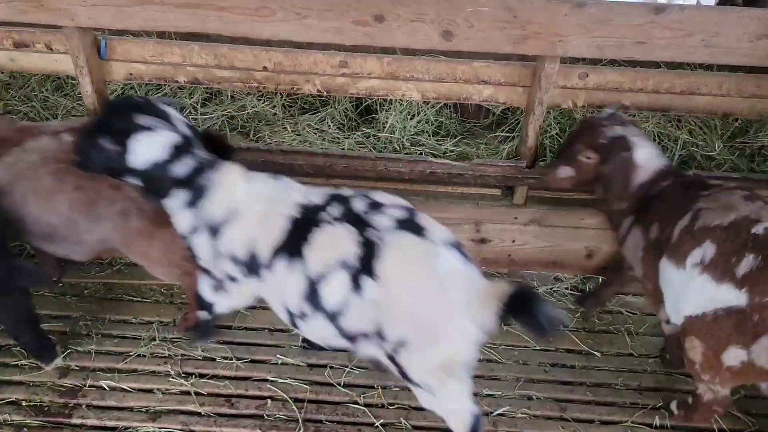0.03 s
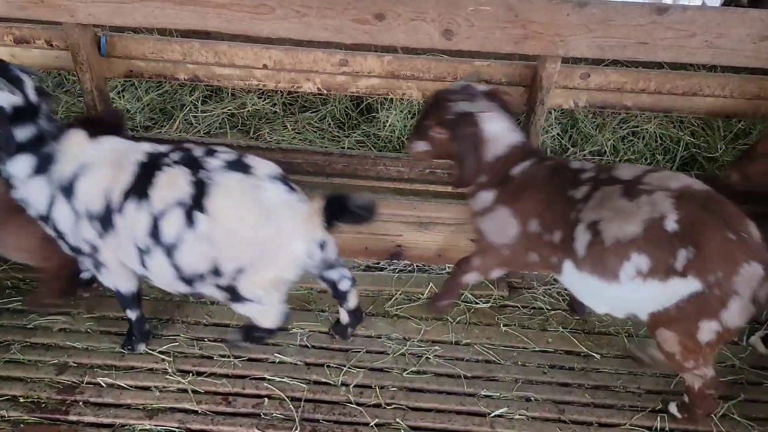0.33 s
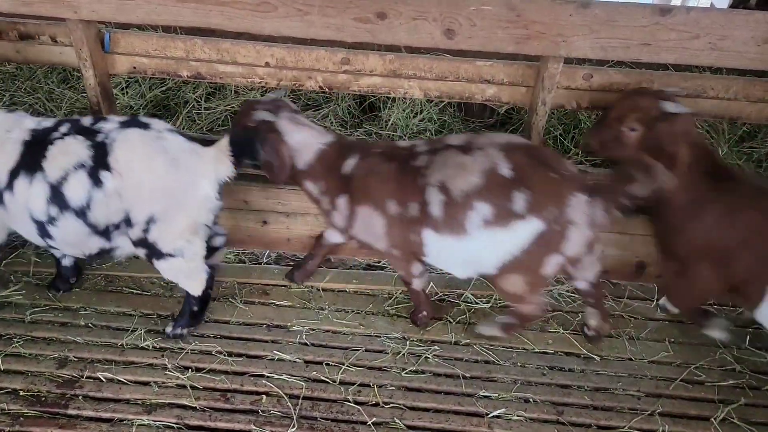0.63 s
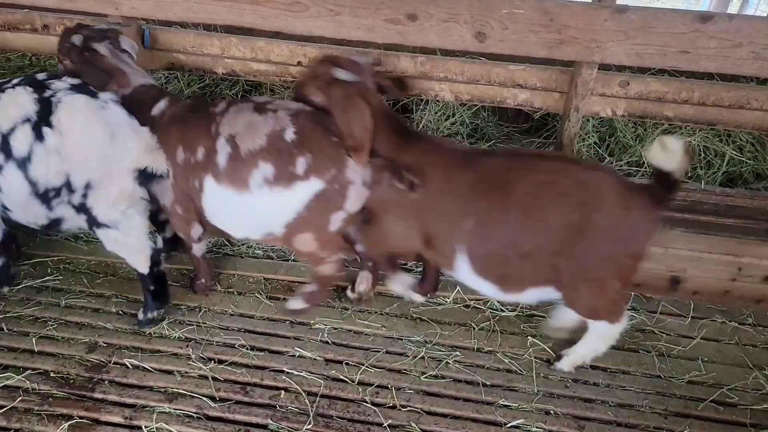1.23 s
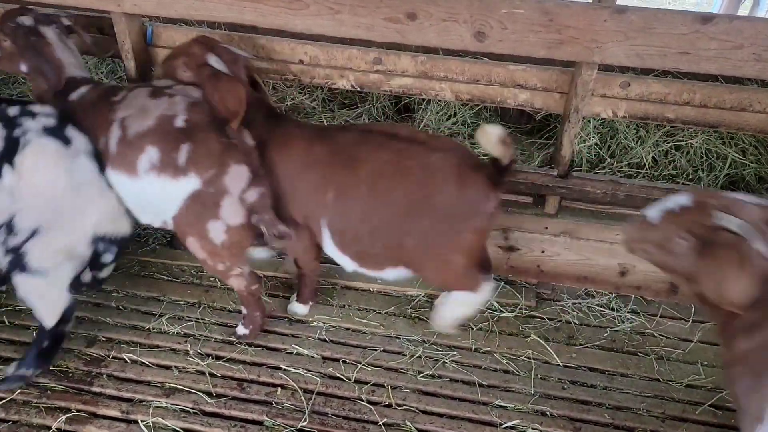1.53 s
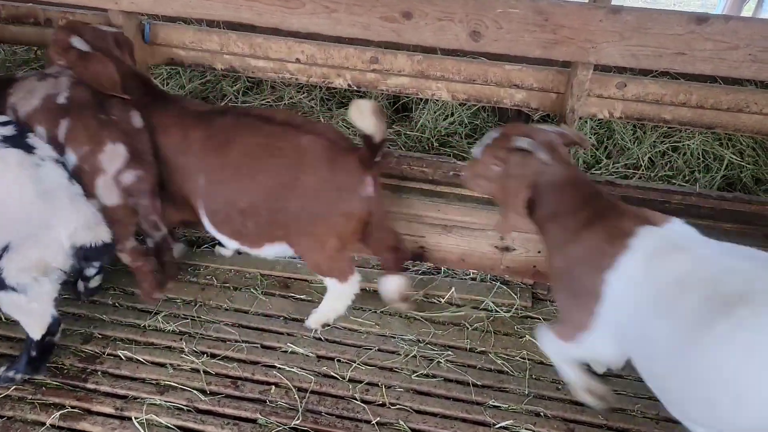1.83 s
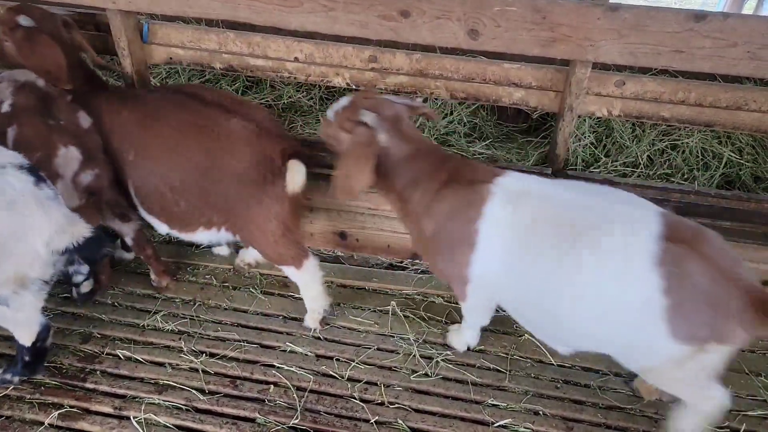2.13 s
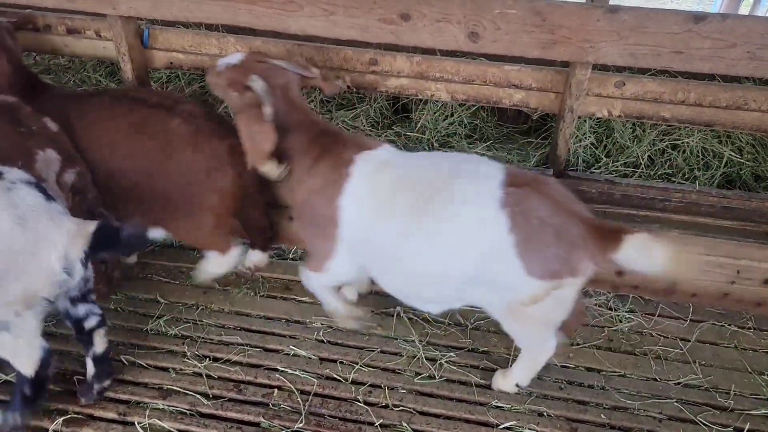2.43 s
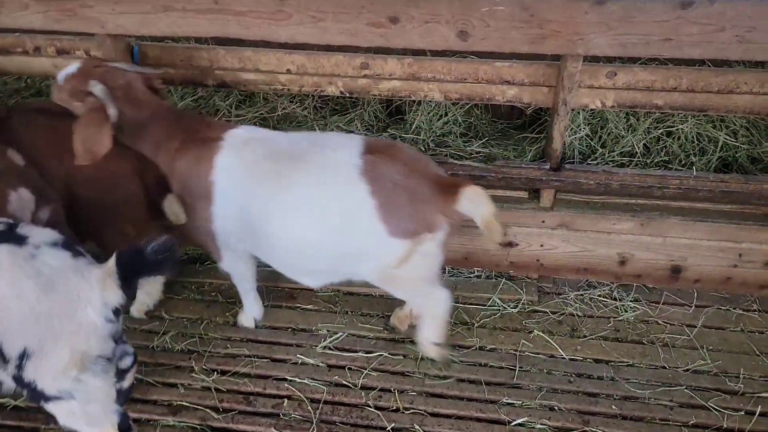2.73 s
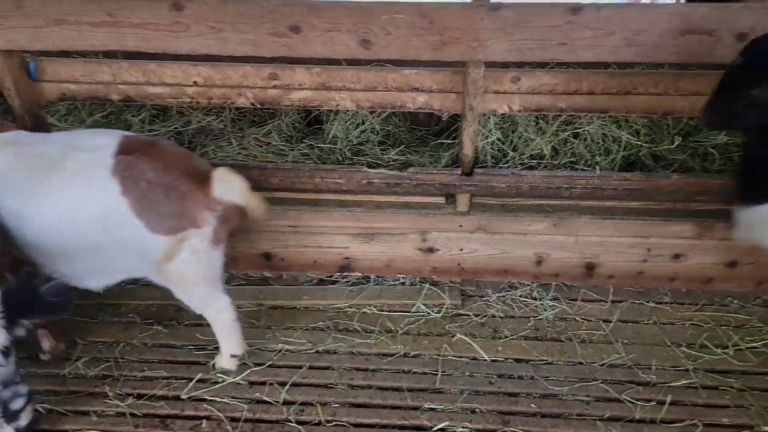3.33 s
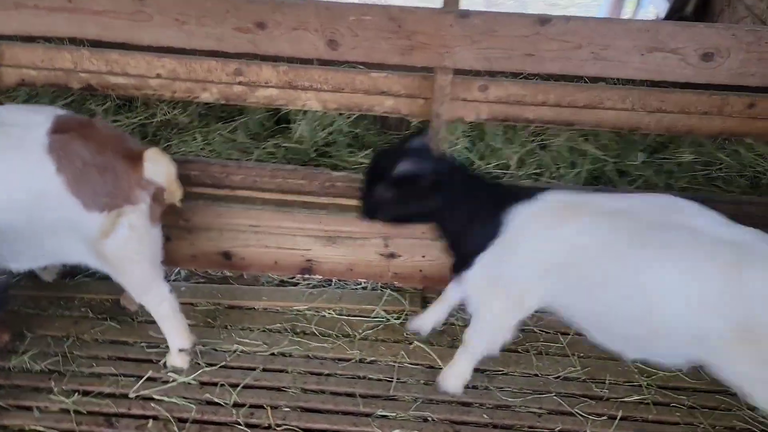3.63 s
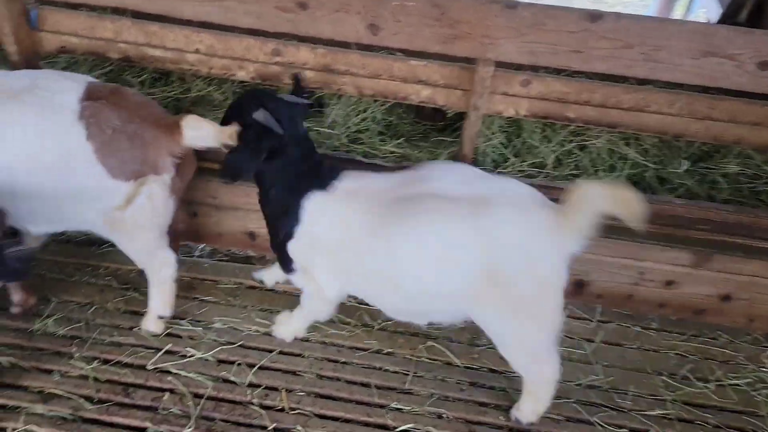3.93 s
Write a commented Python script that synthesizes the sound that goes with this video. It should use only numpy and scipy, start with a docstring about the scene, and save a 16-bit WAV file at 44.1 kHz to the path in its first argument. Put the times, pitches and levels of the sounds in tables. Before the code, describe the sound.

Goat hooves knock and clatter unevenly on a slatted wooden barn floor, a metre or two away. Hay rustles and straw snaps softly between the steps, lighter hooves patter further off, and the knocks get heavier near the end.

```python
"""Hooves knock and clatter as goats trot along a slatted wooden barn floor, a metre or two away.
Each hoof rolls on in a few quick contacts, an impact that excites damped modes: the slat knocks
and the deck thuds, while the horn clicks. Hooves scuff through rustling hay, with small dry clicks
of snapping straw and light hoof ticks, and lighter steps patter further off.
The barn adds a short reverberation; the floor rumbles under the herd."""
import sys
import numpy as np
from scipy import signal
from scipy.fft import rfft, irfft
from scipy.io import wavfile
from scipy.ndimage import uniform_filter1d

SR = 44100
rng = np.random.default_rng(int(sys.argv[2]) if len(sys.argv) > 2 else 0)


def generate_wav(sig):
    """Save sig (samples, or channels by samples) to the path in sys.argv[1] as 16-bit PCM at SR."""
    pcm = np.round(np.clip(np.atleast_2d(sig).T, -1, 1) * 32767).astype(np.int16)
    wavfile.write(sys.argv[1], SR, pcm)


N = 176400

CONTACTS_PER_S, CONTACT_DB, SETTLE_S = 1300, -1, 0.0038  # small contacts around the main blow
CRACK_DB, CLICK_DECAY_S, THUD_LOW_HZ, DECK_PAN_DB = -10.5, 0.009, 107, 2
# Modes of the whole deck: pitch_hz, level_db
DECK_MODES = [(145,-4),(185,3.5),(240,-7)]
# Spectrum of struck or scraped wood: frequency_hz, level_db
WOOD_SPECTRUM = [(100,-23),(320,-1),(850,-2),(1500,-5),(9000,-39.5)]
# Spectrum of the horn's click: frequency_hz, level_db
HORN_SPECTRUM = [(600,-23),(1500,18.5),(2700,11),(4000,-0.5),(6500,-3.5),(8000,-15),(16000,-15.5)]
# Where the nearest hooves land: time_s, left_minus_right_db
HOOF_PAN = [(2.9,3.5),(3.5,1),(3.735,1),(3.85,4)]
# Hoof impacts: blow_s, roll_in_s, knock_db, pitch_hz, thud_db, click_db
HOOF_FALLS = [(0.111,0.0028,-24,412,-29.5,-46),(.411,0.0027,-50,1170,-60,-77),(0.446,0.0018,-38.5,770,-43,-44.5),(0.539,0.0045,-41.5,960,-46,-57),(0.573,0.0037,-40,588,-52,-44),(0.603,0.017,-34.5,617,-45,-65),(0.715,0.0019,-27.5,108,-33.5,-34),(0.719,0.0021,-44.5,1540,-53,-39),(.786,0.0019,-37,778,-43,-50),(0.918,0.0086,-30.5,1130,-45,-58),(1.029,.003,-34.5,814,-45,-47),(1.139,0.0074,-38.5,543,-42,-52),(1.309,0.0026,-40,770,-35.5,-67),(1.428,0.0037,-38,872,-47,-62),(1.474,0.002,-30.5,848,-64,-36.5),(1.535,0.0013,-31,950,-38,-34.5),(1.695,0.0025,-32,323,-34,-68),(1.779,0.0063,-30,1090,-46,-43),(1.833,0.0037,-36,1370,-42.5,-38.5),(2.041,0.0024,-25,795,-51,-34),(2.083,0.0014,-44,313,-38.5,-52),(2.201,0.0011,-33.5,617,-57,-47.5),(2.368,0.0063,-32.5,740,-47,-45.5),(2.649,0.0076,-27.5,940,-44,-40.5),(2.725,0.0045,-39.5,753,-48.5,-56),(2.954,0.005,-24.5,298,-26,-63),(2.962,0.0022,-25.5,623,-44,-55),(3.307,0.009,-36,787,-39,-61),(3.505,0.019,-21,854,-31,-37),(3.518,0.0049,-27,630,-29.5,-40.5),(3.631,0.00093,-39,330,-45,-76),(3.729,0.0033,-26,408,-38.5,-36),(3.740,0.00068,-25,548,-28,-29.5),(3.855,0.0041,-24,1426,-42.5,-27.5),(3.962,0.00071,-23.5,845,-41,-39)]
def hooves():
    """Impact excitation: contacts build to a blow whose force drives slat and deck; the horn clicks."""
    out, t = np.zeros((2, N)), np.arange(SR // 3) / SR
    lead_s = t[SR // 20]
    since_blow = t - lead_s
    for blow_s, roll_in_s, knock_db, pitch_hz, thud_db, click_db in HOOF_FALLS:
        rise = since_blow / roll_in_s
        load = np.exp(np.minimum(rise, -since_blow / SETTLE_S))
        click_envelope = np.exp(np.minimum(rise, -since_blow / CLICK_DECAY_S))
        contacts = burst(load * grains(len(t), CONTACTS_PER_S, spread_db=1.25))
        force = undb(CONTACT_DB) * contacts + burst(1. * (since_blow == 0))
        crack = burst(colour(click_envelope * rng.standard_normal(len(t)), WOOD_SPECTRUM))
        knock = burst(signal.fftconvolve(force, slat(t, pitch_hz))[:len(t)]) + undb(CRACK_DB) * crack
        deck = sum(undb(db) * wood_mode(t, hz * (1 + DETUNE * rng.standard_normal()))
                   for hz, db in DECK_MODES)
        thud = burst(highpass(signal.fftconvolve(force, deck)[:len(t)], THUD_LOW_HZ))
        click = burst(colour(click_envelope * grains(len(t), 6000, spread_db=0.28), HORN_SPECTRUM))
        strike = place(undb(knock_db) * knock + undb(click_db) * click, curve(blow_s, HOOF_PAN))
        add(out, strike + pan(undb(thud_db) * thud, DECK_PAN_DB), blow_s - lead_s)
    return out


OWN_MODE_DB, FOCUS_OCTAVES, DETUNE, CUTOFF_RATIO = 1.5, 0.72, 0.04, 3.44
# Modes of the slats: pitch_hz, level_db
SLAT_MODES = [(345,3),(520,-2.5),(595,-9),(755,1.5),(842,2),(1105,-1),(1290,-2),(1600,0),(1880,0.5),(2800,4)]
def slat(t, pitch_hz):
    """Modal superposition: a slat rings as a sum of modes, weighted towards its own pitch."""
    out = undb(OWN_MODE_DB) * wood_mode(t, pitch_hz)
    for hz, db in SLAT_MODES:
        shift, polarity = rng.standard_normal(2)
        nearness = 1 / (1 + (np.log2(hz / pitch_hz) / FOCUS_OCTAVES) ** 2)
        out += np.sign(polarity) * undb(db) * nearness * wood_mode(t, hz * (1 + DETUNE * shift))
    return highpass(lowpass(out, CUTOFF_RATIO * pitch_hz), pitch_hz / 2)  # low knocks are duller


def wood_mode(t, hz, t60_at_1khz_s=0.033):
    """Damped oscillation: the higher a mode of the wood, the sooner it dies."""
    return np.sin(2 * np.pi * hz * t) * decay(t, t60_at_1khz_s * (1000 / hz) ** .5)


SCUFF_RISE_SHARE, SCUFF_FALL_S, HAY_PAN_DB = 0.17, 0.0099, 3.5
# Spectrum of crushed hay: frequency_hz, level_db
HAY_SPECTRUM = [(400,4),(2800,5),(4200,-1.5),(6500,-5.5),(10000,-15),(13000,-10.5),(16000,-10)]
# Hooves sliding through hay: start_s, length_s, wood_db, hay_db
HOOF_SLIDES = [(0,0.013,-34,-40.5),(0.197,0.035,-36.5,-43),(0.256,0.063,-59,-43),(0.473,0.042,-40,-49),(0.746,0.022,-45,-39),(0.813,0.037,-37.5,-34.5),(0.986,0.042,-37,-41.5),(1.179,0.043,-35,-36),(1.35,0.031,-36.5,-37.5),(1.592,0.029,-36.5,-42),(1.974,0.04,-43.5,-40),(2.39,0.06,-38.5,-39.5),(2.523,0.052,-36.5,-38.5),(2.824,0.061,-53,-44.5),(3.307,0.032,-37,-46),(3.405,0.12,-37.5,-49)]
def scuffs():
    """Friction: a sliding hoof catches on the wood and crushes hay, each in a train of tiny impulses."""
    out, t = np.zeros((2, N)), np.arange(SR // 4) / SR
    for start_s, length_s, wood_db, hay_db in HOOF_SLIDES:
        rise = np.minimum(t / (SCUFF_RISE_SHARE * length_s), 1)
        fall = np.exp(-.5 * t / length_s - np.maximum(t - length_s, 0) / SCUFF_FALL_S)
        wood = undb(wood_db) * unit(colour(grains(len(t), 900, spread_db=1.4), WOOD_SPECTRUM))
        hay = undb(hay_db) * unit(colour(grains(len(t), 2500, spread_db=1.6), HAY_SPECTRUM))
        add(out, place(rise * fall * (wood + hay), HAY_PAN_DB), start_s)
    return out


# Small dry clicks, straw snapping and light hoof ticks: start_s, level_db, low_cut_hz
DRY_CLICKS = [(0.278,-47.5,3500),(.512,-47.5,13000),(0.821,-35.5,2240),(1.196,-36.5,2540),(1.333,-41,13000),(1.517,-53,10000),(1.600,-46.5,4430),(1.68,-47.5,9000),(1.891,-49,1990),(1.954,-47,2350),(2.007,-46,2740),(2.198,-46,4070),(2.411,-41.5,2980),(2.765,-39,1690),(3.727,-39,4030)]
def dry_clicks(decay_s=0.0028):
    """Transients: snapping straw and light hoof ticks each give a short, bright run of impulses."""
    out, t = np.zeros((2, N)), np.arange(SR // 10) / SR
    for start_s, level_db, low_cut_hz in DRY_CLICKS:
        click = colour(grains(len(t), 3000, spread_db=0.73) * np.exp(-t / decay_s), HAY_SPECTRUM)
        add(out, place(undb(level_db) * burst(highpass(click, low_cut_hz)), HAY_PAN_DB), start_s)
    return out


# Level of the rustle and the distant steps together: time_s, level_db
HERD_LEVEL = [(.08,-52.5),(.25,-46.5),(.65,-51),(1.05,-47),(1.9,-48),(2.6,-49),(3.1,-50),(3.65,-57.5),(4,-48.5)]
def herd(fine_hay_hz=7160, stir_db=3.2):
    """Amplitude modulation: over distant steps, crackling hay swells and sinks as legs stir it."""
    out = patter(count=80)
    hold = SR // 30
    for pan_db in (0, HAY_PAN_DB):
        hay = unit(colour(grains(N, 1500, spread_db=3), HAY_SPECTRUM))
        for stalks in (lowpass(hay, fine_hay_hz), highpass(hay, fine_hay_hz)):  # coarse, then fine
            stepped = np.repeat(rng.standard_normal(N // hold + 1), hold)
            stir = unit(uniform_filter1d(stepped, hold))[:N]
            out += place(stalks * undb(stir_db * stir), pan_db) / 2
    return out * undb(curve(np.arange(N) / SR, HERD_LEVEL))


def patter(count, centre_hz=1035, relative_db=-2.5):
    """Impulse responses: goats further along tap slats at random, within an octave of a centre pitch."""
    out, t = np.zeros((2, N)), np.arange(SR // 16) / SR
    for when, pitch, size in rng.random((count, 3)):
        tap = burst(slat(t, centre_hz * 2 ** (2 * pitch - 1)))
        add(out, place(size * tap, HAY_PAN_DB), when * N / SR)
    return undb(relative_db) * unit(out)


# Spectrum of the floor's rumble: frequency_hz, level_db
RUMBLE_SPECTRUM = [(25,-1),(50,-10.5),(64,6.5),(90,-3.5),(190,-10.5),(300,-23.5),(700,-52)]
# Strength of the rumble: time_s, level_db
RUMBLE_LEVEL = [(0,-34.5),(.5,-47),(1.55,-40.5),(2.1,-49),(4,-43)]
def floor_rumble():
    """Forced vibration: the floor under the herd gives a low noise that swells and fades."""
    rumble = unit(colour(rng.standard_normal(N), RUMBLE_SPECTRUM))
    return pan(rumble * undb(curve(np.arange(N) / SR, RUMBLE_LEVEL)), DECK_PAN_DB)


# Spectrum of the barn's background noise: frequency_hz, level_db
AIR_SPECTRUM = [(25,-18),(70,0),(350,-3.5),(750,-7),(1100,-16),(2600,-19),(6500,-29),(8400,-44),(15000,-32.5)]
def barn_air(level_db=-47.5):
    """Ambient noise: a soft, diffuse wash fills the barn."""
    pair = [unit(colour(rng.standard_normal(N), AIR_SPECTRUM)) for _ in range(2)]
    return undb(level_db) * diffuse(pair)


def reverberate(x, near_db=-3, tail_db=-12.5, damping_hz=5260):
    """Reverberation: direct sound, close reflections from floor and feeder, and the barn's short tail."""
    tail = signal.sosfilt(signal.butter(1, damping_hz, fs=SR, output="sos"), echoes(0.16, 0.014))
    response = undb(near_db) * echoes(t60_s=0.047, build_s=0.0015) + undb(tail_db) * tail
    response[:, 0] += 1  # direct sound
    return signal.fftconvolve(x, response, axes=1)[:, :N]


def echoes(t60_s, build_s):
    """Dense reflections merge into noise that builds up and then decays exponentially."""
    t = np.arange(SR // 2) / SR
    field = diffuse(rng.standard_normal((2, len(t)))) * decay(t, t60_s) * np.minimum(t / build_s, 1) ** 2
    return field / np.sqrt(np.sum(field ** 2) / 2)


def diffuse(pair, crossover_hz=255):
    """Diffuse field: left and right are coherent in the bass and unrelated in the treble."""
    side = highpass(pair[1], crossover_hz)
    return np.array([pair[0] + side, pair[0] - side]) / np.sqrt(2)


def place(x, db, mean_lag_s=0.00028):
    """Time and level difference: sound reaches the left later, by a lag that varies from spot to spot."""
    i = np.arange(len(x))
    shift = round((1 + .25 * rng.standard_normal()) * mean_lag_s * SR / 2)
    return pan(np.array([np.interp(i - side * shift, i, x, left=0, right=0) for side in (1, -1)]), db)


def pan(x, db):
    """Level difference, left minus right, sets the direction."""
    return x * undb(np.array([[db], [-db]]) / 2)


def grains(count, per_s, spread_db):
    """Poisson process: random clicks, mostly small and a few large."""
    chance, size, sign = rng.random(count), rng.exponential(size=count), rng.standard_normal(count)
    return (chance < per_s / SR) * undb(spread_db * np.minimum(size, 5)) * np.sign(sign)


def colour(x, spectrum):
    """Minimum-phase filter through points of frequency_hz, level_db."""
    hz, db = np.array(spectrum, float).T
    size = 8192
    bins_hz = np.maximum(np.fft.rfftfreq(size, 1 / SR), 1)
    cepstrum = irfft(np.log(undb(np.interp(np.log(bins_hz), np.log(hz), db))))
    cepstrum[1:size // 2] *= 2  # folding onto positive time makes the filter causal
    cepstrum[size // 2 + 1:] = 0
    return signal.fftconvolve(x, irfft(np.exp(rfft(cepstrum))))[:len(x)]


def lowpass(x, hz):
    """Third-order cut of the treble."""
    return signal.sosfilt(signal.butter(3, min(hz, SR / 3), fs=SR, output="sos"), x)


def highpass(x, hz):
    """Second-order cut of the bass."""
    return signal.sosfilt(signal.butter(2, min(hz, SR / 3), "high", fs=SR, output="sos"), x)


def decay(t, t60_s):
    """Exponential decay by 60 dB in t60_s."""
    return np.exp(-np.log(1000) * t / t60_s)


def curve(t, points):
    """Linear interpolation through points of time_s, value."""
    return np.interp(t, *np.array(points).T)


def undb(db):
    """Decibels to gain."""
    return 10 ** (np.asarray(db) / 20)


def unit(x):
    """Scale to an rms of one."""
    return x / np.sqrt(np.mean(x ** 2) + 1e-20)


def burst(x):
    """Scale a short sound to the energy of 20 ms at an rms of one."""
    return x / np.sqrt(np.sum(x ** 2) / (.02 * SR) + 1e-20)


def add(out, x, start_s):
    """Mix a stereo sound in at a time."""
    i = max(int(start_s * SR), 0)
    n = min(x.shape[1], N - i)
    out[:, i:i + n] += x[:, :n]


def scene():
    """Superposition: the goats, reverberating in the barn, add to the rumble and the ambient noise."""
    return reverberate(hooves() + scuffs() + dry_clicks() + herd()) + floor_rumble() + barn_air()


# Response of the left microphone: frequency_hz, gain_db
LEFT_RESPONSE = [(6000,1.5),(8500,-7),(11000,-5),(14000,-1.5)]
def record(dry, top_hz=15900):
    """Band limiting: the left microphone is duller, and a steep low-pass cuts the top of both sides."""
    pair = np.array([colour(dry[0], LEFT_RESPONSE), dry[1]])
    return signal.sosfilt(signal.ellip(10, .2, 80, top_hz, fs=SR, output="sos"), pair)


dry = scene()
out = record(dry)
generate_wav(out)
```